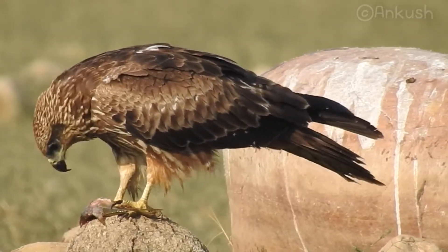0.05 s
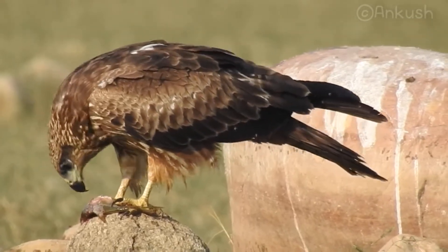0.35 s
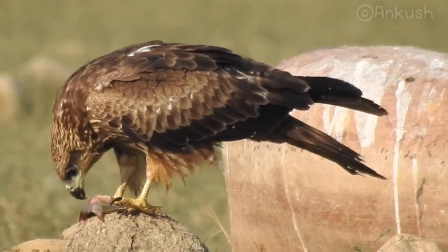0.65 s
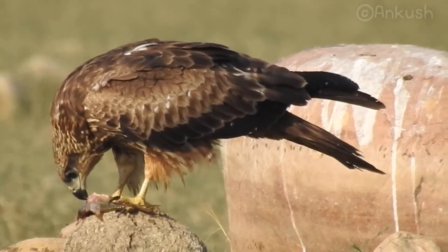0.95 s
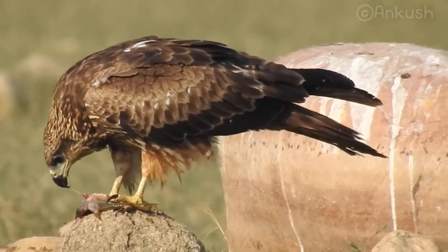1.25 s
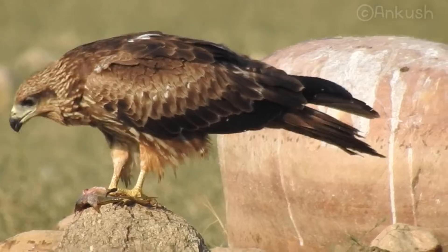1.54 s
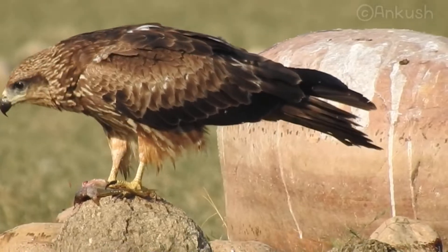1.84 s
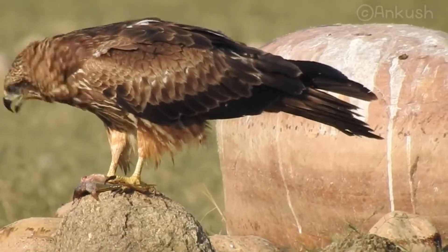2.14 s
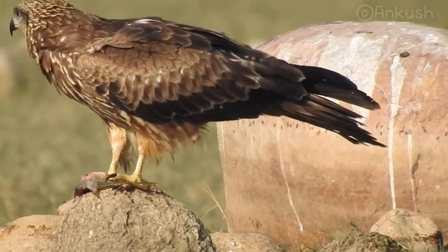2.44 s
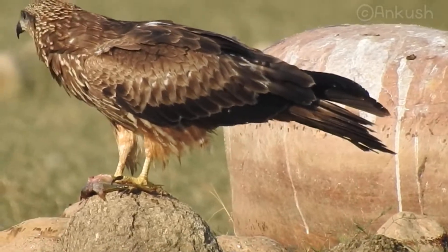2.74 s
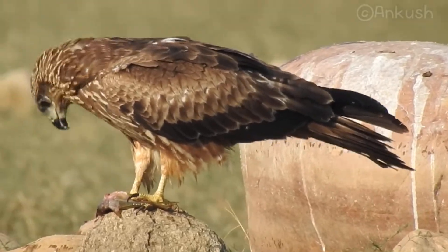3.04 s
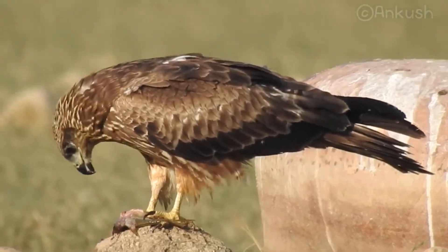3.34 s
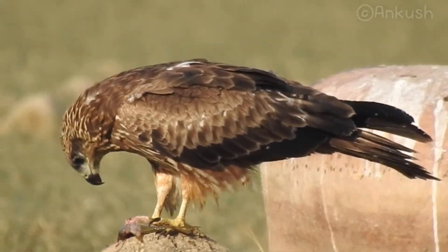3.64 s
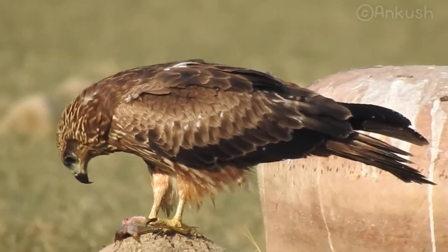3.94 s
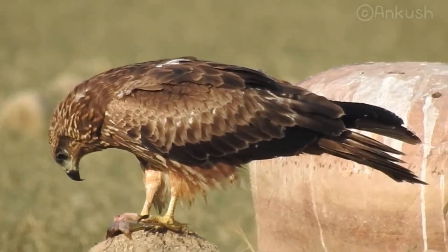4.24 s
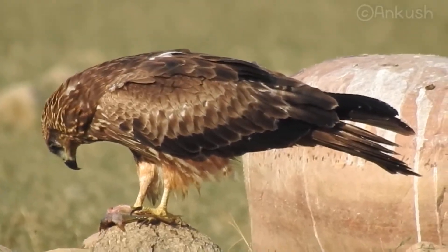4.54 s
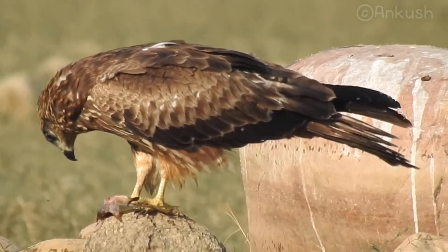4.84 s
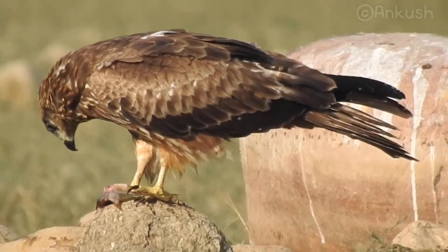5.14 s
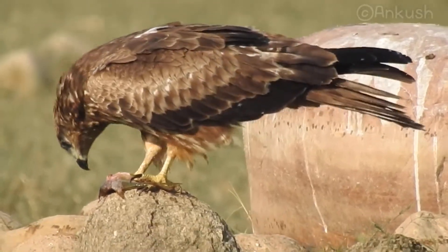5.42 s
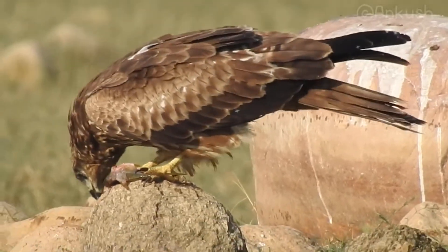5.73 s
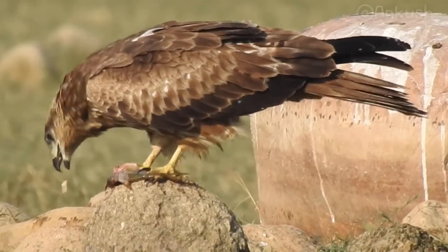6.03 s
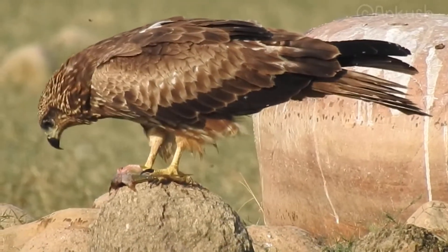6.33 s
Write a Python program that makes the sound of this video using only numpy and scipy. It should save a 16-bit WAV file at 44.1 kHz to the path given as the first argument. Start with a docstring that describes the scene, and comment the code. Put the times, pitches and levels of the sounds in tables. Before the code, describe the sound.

Outdoors in open grassland, the microphone picks up a constant shimmer of insects and a low, distant rumble. Over this, small birds twitter densely at first, thin out into sliding whistles, then return in several short, bright bursts, mostly a little to the right. Far ringing taps like a tool on stone, a soft bump and faint rustles fall in between, and the chatter is lively again at the end.

```python
"""A buzzy note and quick twitters open over hissing insects and a low far rumble in a grassy field.
Small songbirds chatter and whistle on, mostly a little to the right. Each note is one gliding tone
from the syrinx, shaped by throat and beak and faintly scattered by the ground. The insects are a
noise band near 6 kHz. Distant clinks, clacks and a soft bump (struck, ringing modes) and dull
rustles (swells of noise) come in between."""
import sys
import numpy as np
from scipy import signal
from scipy.fft import rfft, irfft
from scipy.io import wavfile
from scipy.ndimage import uniform_filter1d

SR = 44100
rng = np.random.default_rng(int(sys.argv[2]) if len(sys.argv) > 2 else 0)


def persist_wave(psi):
    """Save psi, clipped to +-1, as 16-bit WAV."""
    counts = np.round(np.clip(psi, -1, 1) * 32767).astype(np.int16)
    wavfile.write(sys.argv[1], SR, np.atleast_2d(counts).T)


N = 281358
LEAD_S = 0.00088  # extra fade time at a note's edge


def undb(db):
    """Decibels to gain."""
    return 10 ** (np.asarray(db) / 20)


def pan(left_db):
    """Stereo gains, left over right by left_db."""
    return undb(np.array([[left_db], [-left_db]]) / 2)


def at_hz(points, hz):
    """Interpolate (f/Hz, value) points on a log-frequency axis."""
    f, value = np.transpose(points)
    return np.interp(np.log(hz + 1), np.log(f), value)


def add(out, s, sound):
    """Mix a stereo sound in at time s."""
    i = int(np.clip(s * SR, 0, N))
    out[:, i:i + sound.shape[1]] += sound[:, :N - i]


def walk(rate_hz):
    """Random steps, smoothed twice."""
    hold = int(SR / rate_hz)
    steps = np.repeat(rng.standard_normal(N // hold + 1), hold)
    return 0.5 * uniform_filter1d(uniform_filter1d(steps, hold), hold)[:N]


def wobble(t, rate_hz, count=160):
    """Two independent piecewise-linear random curves."""
    corners = rng.standard_normal((2, count))
    return np.array([np.interp(t * rate_hz, np.arange(count), row) for row in corners])


def patchy(x, depth_db, hold_s, size=1024):
    """Each narrow band swells and sinks on its own; overall rms is kept."""
    bands = signal.stft(x, nperseg=size)[2]
    frames = max(int(2 * hold_s * SR / size), 1)
    swell = uniform_filter1d(rng.standard_normal(bands.shape[1:]), size=7, axis=0)
    swell = uniform_filter1d(swell, frames, axis=1)
    y = signal.istft(bands * undb(depth_db * swell / np.std(swell)), nperseg=size)[1][:, :N]
    return y * np.std(x) / np.std(y)


def scatter(x, db, t60_s):
    """Grass and stones add a short tail, different in each channel."""
    t = np.arange(SR // 2) / SR
    tail = rng.standard_normal((2, len(t))) * undb(-60 * t / t60_s) * (1 - np.exp(-t / 0.0064))
    tail /= np.sqrt(np.sum(tail ** 2, axis=1, keepdims=True))
    return x + undb(db) * signal.fftconvolve(x.mean(axis=0)[None], tail, axes=1)[:, :N]


# background width: f/Hz, side over mid/dB
WIDTH = [(60, -25), (200, -12), (400, -5), (1300, -4.5), (2400, -1.5), (4400, -5), (6300, 3), (7800, -18),
         (15000, -53)]


def diffuse_noise(spectrum, mid_rms_db):
    """Coloured stereo noise from independent mid and side signals."""
    hz = np.arange(N // 2 + 1) * SR / N
    gain = undb(at_hz(spectrum, hz)) * (hz > spectrum[0][0]) * (hz < spectrum[-1][0])
    mid = irfft(rfft(rng.standard_normal(N)) * gain, N)
    side = irfft(rfft(rng.standard_normal(N)) * gain * undb(at_hz(WIDTH, hz)), N)
    return undb(mid_rms_db) / np.std(mid) * np.array([mid + side, mid - side])


# background spectra: f/Hz, relative density/dB
RUMBLE_SPECTRUM = [(13, -58), (22, -41), (32, -38), (40, -13.5), (53, -8.5), (81, 2), (131, -8.5),
                   (172, -5), (245, -17.5), (312, -21.5), (450, -28.5), (580, -99), (990, -120)]
AIR_SPECTRUM = [(240, -53), (400, -10), (559, 3.5), (651, -2), (717, 2), (910, -3), (1300, -1), (1760, -7),
                (3830, -6), (5300, 0.5), (6890, -68), (11700, -120)]
INSECT_SPECTRUM = [(3060, -13), (5200, -17), (5420, -40), (5560, -1.5), (5940, 4.5), (6350, 8), (7120, -2),
                   (7430, -11.5), (7800, -20), (8600, -43)]
HISS_SPECTRUM = [(4410, -27), (7500, -1), (8500, -0.5), (10000, -4), (12500, -7.5), (14100, -10.5),
                 (15700, -13.5)]
# stirring of the air: t/s, gain/dB
AIR_STIR = [(0, 0.5), (1.3, -1), (1.8, 1.5), (3.3, 1.5), (6.3, 1.5)]


def field():
    """Far rumble, restless air, a shimmering insect chorus and a smooth top hiss."""
    rumble = diffuse_noise(RUMBLE_SPECTRUM, -48)
    stir_db = np.interp(np.arange(N) / SR, *np.transpose(AIR_STIR))
    air = patchy(diffuse_noise(AIR_SPECTRUM, -59.5), depth_db=2.7, hold_s=.07) * undb(stir_db)
    insects = patchy(diffuse_noise(INSECT_SPECTRUM, -48.5), depth_db=2.5, hold_s=.03)
    insects *= undb(walk(rate_hz=60))
    return rumble + air + insects + diffuse_noise(HISS_SPECTRUM, -64.5)


def syrinx(hz, db, pan_db=0, overtone_db=-38, flutter_db=3.0, waver=0.0079, rasp=0):
    """A nearly pure tone, boosted near the throat resonance; rasp roughens phase and amplitude."""
    throat_hz, throat_q = 4800, 3.43
    left_lag_s = .000032  # the birds reach the right channel first
    t = np.arange(len(hz)) / SR
    pitch_drift, breath_drift = wobble(t, rate_hz=300)
    phase_grit, amp_grit = rasp * wobble(t, rate_hz=900)
    phase = 2 * np.pi * np.cumsum(hz * (1 + waver * pitch_drift)) / SR + phase_grit
    stereo_phase = np.array([phase - 2 * np.pi * hz * left_lag_s, phase])
    tone = np.sin(stereo_phase) + undb(overtone_db) * np.sin(2 * phase)
    ramp_s = .0026 + .04 * t[-1]
    opening = np.clip(np.minimum(t, t[-1] - t) / ramp_s, 0, 1)
    throat = 1 / np.sqrt(1 + (throat_q * (hz / throat_hz - throat_hz / hz)) ** 2)
    envelope = np.sin(opening * np.pi / 2) ** 2 * undb(db + flutter_db * breath_drift) * (1 + amp_grit)
    return pan(pan_db) * throat * envelope * tone


# buzzy notes: t/s, length/s, start f/Hz, end f/Hz, vibrato rate/Hz, swing/Hz, level/dB
BUZZES = [(0.0, 0.049, 6000, 5440, 185, 380, -35.5), (.617, 0.13, 6340, 5380, 160.2, 398, -39),
          (1.487, 0.043, 5370, 5260, 104, 704, -39.5), (1.52, 0.049, 3770, 3380, 108, 350, -40),
          (2.648, 0.13, 3660, 3770, 44, 110, -49.5)]


def buzzes(tremolo_db=4):
    """Mostly falling notes shaken by a fast vibrato."""
    out = np.zeros((2, N))
    for s, length_s, start_hz, end_hz, rate_hz, swing_hz, db in BUZZES:
        t = np.arange(int(length_s * SR)) / SR
        vibrato = np.sin(2 * np.pi * rate_hz * t)
        hz = start_hz + (end_hz - start_hz) * (t / length_s) ** 2 + swing_hz * vibrato
        add(out, s, syrinx(hz, db - tremolo_db * vibrato))
    return out


def glide(length_s, start_hz, aim_hz, end_hz, bend, start_db, end_db, pan_db=0, shake=1):
    """The pitch slides towards aim_hz and away again; a high bend makes both slides quick."""
    u = np.arange(-LEAD_S, length_s + LEAD_S, 1 / SR) / length_s
    slide_in, slide_out = np.clip([1 - u, u], 0, None) ** bend
    hz = aim_hz + (start_hz - aim_hz) * slide_in + (end_hz - aim_hz) * slide_out
    db = start_db + (end_db - start_db) * np.clip(u, 0, 1)
    return syrinx(np.clip(hz, 1800, 8500), db, pan_db, flutter_db=1.3 * shake, waver=.007 * shake)


def song(notes):
    """Mix notes given as (t/s, *glide arguments)."""
    out = np.zeros((2, N))
    for s, *shape in notes:
        add(out, s - LEAD_S, glide(*shape))
    return out


# bouts of far chatter: t/s, length/s, level/dB
FAR_BOUTS = [(0.0, 1.27, -47.5), (1.301, 0.29, -46.5), (2.604, 0.23, -55.5), (2.849, 0.55, -57),
             (3.521, .5, -55), (4.171, 0.39, -58.5), (5.297, 0.32, -57)]


def far_chatter(gap_s=.029, note_s=0.014, centre_hz=3900, slide=0.55, bend=2.83):
    """Far birds run through random falling, rising or curled notes."""
    out = np.zeros((2, N))
    for s, length_s, db in FAR_BOUTS:
        for k, (late, stretch, pitch, start, end, loud) in enumerate(rng.uniform(-1.2, 1, (80, 6))):
            if k * gap_s < length_s:
                contour = np.array([1 + slide * (start + .5), 1, 1 + .5 * slide * end])
                pitches_hz = centre_hz * (1 + .17 * pitch) * contour
                note = glide(note_s * 2 ** stretch, *pitches_hz, bend, db + 4 * loud, db)
                add(out, s + (k + 0.49 * late) * gap_s, note)
    return out


# twitters: crest t/s, climb/s, drop/s, start f/Hz, crest f/Hz, end f/Hz, level/dB
TWITTERS = [(.009, 0.0025, 0.01, 4400, 4720, 4200, -38), (.021, .003, 0.0084, 4170, 4470, 3300, -36),
            (.040, .010, .002, 3930, 5000, 4800, -38), (.047, .008, 0.0056, 3340, 4450, 3280, -30.5),
            (0.057, 0.005, 0.014, 3650, 5060, 3100, -33.5), (.098, 0.0018, .007, 4600, 4670, 4300, -39),
            (.114, 0.011, 0.004, 3450, 4460, 3100, -35), (.137, 0.0088, 0.0013, 3050, 4600, 4300, -29),
            (0.147, 0.0044, 0.01, 3650, 4670, 3050, -30.5), (.222, .003, 0.0091, 3930, 4560, 3170, -33.5),
            (.251, 0.0061, 0.0052, 4710, 5300, 3300, -29.5), (.265, .005, 0.0082, 3350, 5040, 3400, -30),
            (.310, 0.0024, 0.0023, 4160, 5640, 4200, -35), (0.315, 0.0027, 0.0016, 4100, 5770, 5000, -27),
            (.333, 0.013, 0.0067, 4500, 4970, 3280, -33), (.358, 0.0076, 0.0045, 3120, 5240, 3500, -28.5),
            (0.37, 0.0031, 0.013, 3730, 5400, 3330, -28.5), (.423, 0.0022, 0.0047, 5500, 5400, 4700, -31.5),
            (0.434, 0.0048, 0.012, 4400, 5180, 3360, -33), (.461, 0.012, 0.0032, 4340, 5090, 4400, -30.5),
            (0.472, 0.0046, 0.0098, 3630, 4600, 3800, -29), (0.705, 0.0026, .002, 4300, 5500, 4300, -40),
            (.748, 0.0056, 0.0018, 3020, 3960, 3800, -32), (.814, 0.0023, 0.0019, 4650, 5600, 4000, -29.5),
            (.923, 0.0089, 0.0049, 3620, 3900, 3400, -33.5), (0.929, 0.0027, 0.0053, 3470, 3970, 3200, -31),
            (0.936, 0.0015, 0.0081, 3400, 3810, 3050, -32),
            (0.965, 0.0094, 0.0039, 4270, 5470, 4300, -31.5), (0.97, 0.0028, 0.0056, 4200, 4400, 3600, -30),
            (6.181, .004, 0.0025, 3920, 5300, 4400, -30), (6.187, 0.0041, .001, 4200, 5700, 5500, -29),
            (6.3513, 0.0016, .005, 4720, 5100, 3400, -28), (6.334, 0.0058, .004, 3380, 5180, 3970, -29.5)]


def twitters(climb_bend=1.57, drop_bend=0.98, edge_db=-3):
    """Lopsided, raspy notes that climb to a crest and drop."""
    out = np.zeros((2, N))
    for s, climb_s, drop_s, start_hz, crest_hz, end_hz, db in TWITTERS:
        t = np.arange(-climb_s - LEAD_S, drop_s + LEAD_S, 1 / SR)
        climb = np.clip(1 + t / climb_s, 0, 1) ** climb_bend
        drop = np.clip(t / drop_s, 0, 1) ** drop_bend
        off_crest = np.where(t < 0, 1 - climb, drop)
        hz = crest_hz + (np.where(t < 0, start_hz, end_hz) - crest_hz) * off_crest
        add(out, s + t[0], syrinx(hz, db + edge_db * off_crest, waver=0.018, rasp=.3))
    return out


def knocks(blows, modes, contact_t60_s, contact_top_hz, upper_hz=1400, attack_s=0.0014):
    """Blows ring an object's modes, the upper ones by where they land, with dull contact noise."""
    out, t = np.zeros((2, N)), np.arange(SR // 2) / SR
    colour = signal.butter(1, [500, contact_top_hz], "band", fs=SR, output="sos")
    distance = signal.butter(2, 9000, fs=SR, output="sos")
    for s, ring_db, contact_db, upper_db in blows:
        ring = np.zeros(len(t))
        for k, (hz, db, t60_s) in enumerate(modes):
            decay = undb(db + upper_db * (hz > upper_hz) - 60 * t / t60_s)
            ring += (-1) ** k * decay * np.sin(2 * np.pi * hz * t)  # alternate signs: a brief swell
        contact = rng.standard_normal(len(t)) * undb(contact_db - 60 * t / contact_t60_s)
        blow = (undb(ring_db) * ring + signal.sosfilt(colour, contact)) * np.minimum(t / attack_s, 1)
        add(out, s, np.tile(signal.sosfilt(distance, blow), (2, 1)))
    return out


# blows: t/s, ring level/dB, contact level/dB, upper-mode gain/dB
CLINKS = [(.047, -37, -44, -5.5), (1.801, -50.5, -42, 12), (2.829, -52.5, -40, 8), (4.581, -38, -38, 1)]
# modes: f/Hz, level/dB, t60/s
CLINK_MODES = [(694, -16, .08), (1068, 2, 0.12), (1183, -1, 0.2), (1445, -17, 0.13), (1550, -9, 0.14),
               (2320, -18, 0.058), (2513, -9, 0.098)]


def clinks():
    """Distant ringing blows, as of a tool on stone."""
    blows = knocks(CLINKS, CLINK_MODES, contact_t60_s=0.2, contact_top_hz=2220)
    return scatter(blows, db=-13.5, t60_s=0.076)


# rustles: t/s, length/s, centre f/Hz, level/dB
RUSTLES = [(0.086, 0.19, 326, -63.5), (0.392, 0.1, 368, -60.5), (1.709, 0.078, 940, -56.5),
           (2.08, 0.079, 695, -57), (2.155, 0.066, 400, -60), (2.218, 0.087, 850, -60),
           (2.78, 0.28, 480, -61.5), (3.169, 0.1, 800, -57), (3.218, 0.13, 352, -57.5),
           (3.318, 0.19, 590, -62.5), (3.686, .06, 620, -58), (4.04, 0.33, 364, -60.5),
           (4.459, 0.11, 480, -56), (4.691, 0.062, 400, -59), (5.529, .13, 1300, -60),
           (6.14, 0.082, 368, -56.5)]


def rustles(edge_ratio=1.39, width=0.37):
    """Dull, far rustles: noise bands that swell and fade."""
    out = np.zeros((2, N))
    for s, length_s, hz, db in RUSTLES:
        swell = np.sin(np.linspace(0, np.pi, int(length_s * SR)))
        band = signal.butter(2, [hz / edge_ratio, hz * edge_ratio], "band", fs=SR, output="sos")
        mid, side = signal.sosfilt(band, rng.standard_normal((2, SR // 2)))[:, :len(swell)]
        stereo = np.array([mid + width * side, mid - width * side])
        add(out, s, undb(db) / np.std(mid) * swell * stereo)
    return out


# quick chatter: t/s, length/s, crest f/Hz, trough f/Hz, end f/Hz, fall time/s, level/dB
SWOOPS = [(0.193, 0.014, 5950, 3200, 3700, 0.0053, -31), (0.208, 0.012, 5150, 3150, 4240, 0.0025, -24.5),
          (.709, 0.021, 5430, 3730, 3350, 0.0042, -30.5), (0.728, 0.0077, 4860, 3800, 3600, 0.0016, -30),
          (0.751, 0.024, 4000, 3300, 2980, 0.0041, -23), (0.77, 0.012, 4600, 3640, 3350, 0.0026, -27),
          (0.819, 0.019, 5400, 3500, 3500, 0.0026, -30.5), (0.834, 0.012, 4550, 3500, 3300, 0.0022, -27),
          (0.855, 0.021, 4400, 3270, 3050, 0.003, -26), (0.875, 0.014, 4600, 3550, 3200, 0.0026, -29.5),
          (1.007, 0.0066, 7620, 4000, 4500, 0.0039, -22), (1.017, 0.013, 6650, 3620, 4360, 0.0053, -27),
          (1.03, 0.018, 5680, 3520, 3700, 0.0046, -26), (1.057, 0.012, 7130, 3220, 3420, .0045, -24.5),
          (1.081, 0.015, 5600, 3270, 3100, 0.0025, -27), (1.1, 0.015, 5130, 3350, 2640, 0.0029, -30),
          (1.127, 0.019, 6000, 3350, 3370, 0.0027, -23.5), (1.151, .010, 5830, 3180, 2700, 0.0022, -28),
          (1.311, 0.016, 7080, 3930, 5500, 0.0041, -27), (1.327, 0.013, 5370, 3670, 5100, 0.0017, -25),
          (1.341, 0.0071, 4200, 3680, 4770, 0.0018, -26), (1.352, 0.015, 5880, 3540, 3350, 0.0026, -24),
          (1.374, 0.022, 6500, 3350, 3270, 0.0019, -23.5), (1.394, 0.013, 6100, 3100, 2780, 0.0028, -26.5),
          (1.422, 0.03, 5950, 3470, 3040, 0.0028, -26.5), (2.321, 0.01, 6730, 4980, 5370, 0.0025, -23),
          (2.3305, 0.015, 5780, 4090, 4650, 0.002, -22.5), (2.356, .018, 6940, 3560, 4630, 0.0042, -22.5),
          (2.38, 0.012, 6350, 3650, 3850, 0.0026, -23.5), (2.402, 0.016, 6640, 3400, 2780, 0.0025, -24.5),
          (2.427, .016, 6070, 3980, 4330, 0.0025, -26.5), (2.453, 0.017, 6330, 3130, 2830, 0.0039, -25.5),
          (2.494, 0.0095, 6260, 4650, 5100, 0.0029, -23.5), (2.518, .014, 6240, 4060, 3320, 0.0024, -22),
          (3.4, .009, 5400, 4350, 4500, .003, -45), (3.444, 0.01, 7000, 4250, 4200, .004, -39.5),
          (3.532, 0.014, 7200, 4860, 6300, 0.0037, -24), (3.554, 0.0039, 7000, 3200, 2900, 0.0038, -18),
          (3.578, .023, 6850, 3600, 5230, 0.0029, -32.5), (3.602, 0.026, 6680, 3300, 4660, 0.0053, -27),
          (3.631, 0.02, 6800, 3420, 5330, 0.0033, -25.5), (3.655, 0.0064, 6720, 3170, 3000, 0.0029, -26.5),
          (3.94, 0.02, 6250, 3140, 5660, 0.0037, -26), (3.966, 0.022, 6630, 2770, 5380, 0.0022, -26.5),
          (3.989, .018, 6150, 3070, 3700, 0.0027, -27.5), (4.012, 0.01, 6350, 3600, 3000, 0.0019, -32.5),
          (4.207, .012, 5400, 3600, 3400, 0.0036, -51), (4.236, .014, 5400, 3600, 3280, 0.0036, -46),
          (4.35, .018, 5200, 3400, 3300, 0.0039, -42), (4.366, 0.018, 5200, 3300, 3200, 0.0043, -36),
          (4.393, .008, 5400, 3600, 3200, .003, -45), (4.423, .014, 5200, 3430, 3600, 0.0032, -40.5),
          (4.446, 0.0096, 5400, 3400, 3000, 0.0026, -39), (4.544, 0.017, 5100, 4190, 4400, 0.0028, -38.5),
          (4.571, .008, 4800, 3740, 3400, .003, -39), (4.983, .012, 7400, 4720, 5270, 0.0042, -22.5),
          (4.999, 0.015, 6900, 4290, 5260, 0.0031, -21.5), (5.013, 0.013, 5380, 3850, 4400, 0.0047, -22.5),
          (5.0335, 0.011, 5800, 2970, 3000, 0.0057, -19.5), (5.054, 0.017, 5230, 2820, 3100, 0.0075, -24),
          (5.082, 0.011, 5400, 2870, 2750, 0.0052, -23.5), (5.111, 0.023, 5900, 3230, 3970, 0.0047, -23.5),
          (5.137, 0.011, 5750, 2770, 2600, 0.004, -21.5), (5.224, 0.015, 7480, 4670, 6360, 0.003, -19.5),
          (5.2427, 0.018, 7150, 4120, 5560, 0.0032, -18.5), (5.267, 0.011, 6790, 4060, 2940, 0.0022, -19.5),
          (6.108, 0.022, 6470, 3750, 5060, 0.0066, -21), (6.135, 0.027, 6000, 3080, 3520, 0.0026, -24.5),
          (6.157, 0.025, 6400, 3030, 4400, 0.0026, -25.5), (6.185, 0.014, 5380, 3130, 3800, .002, -24),
          (6.22, 0.015, 6030, 3370, 3320, 0.003, -22), (6.243, .022, 5800, 2950, 3430, 0.0045, -25.5),
          (6.271, .007, 6320, 2980, 2800, 0.0034, -30)]


def swoops(steepness=3.63, bend=4.03):
    """Each note climbs softly to a crest, dives towards a trough, then turns up or sinks on."""
    climb_s, climb_depth, climb_db, swell_s = .006, 0.298, -15, 0.0026
    easy_hz, strain_db_per_khz, tire_db_per_s = 4370, 9, 229  # the voice weakens when low, and with time
    out = np.zeros((2, N))
    for s, length_s, crest_hz, trough_hz, end_hz, fall_s, db in SWOOPS:
        t = np.arange(-climb_s, length_s + LEAD_S, 1 / SR)
        before, after_s = np.clip(-t / climb_s, 0, 1), t.clip(0)
        dive = 1 / (1 + 2 * (after_s / fall_s) ** steepness)
        turn = np.minimum(after_s / length_s, 1) ** bend
        hz = trough_hz + (crest_hz - trough_hz) * dive + (end_hz - trough_hz) * turn
        hz *= 1 - climb_depth * before ** 2
        strain_db = strain_db_per_khz * np.maximum(easy_hz - hz, 0) / 1000
        onset_db = climb_db * np.clip(1 - t / swell_s, 0, 1)
        level_db = db + onset_db - strain_db - tire_db_per_s * after_s
        add(out, s - climb_s, syrinx(hz, level_db, overtone_db=-36, flutter_db=1.6, waver=.018, rasp=.17))
    return out


# high lead-in pips: t/s, length/s, f/Hz, level/dB
PIPS = [(0.243, 0.0093, 4680, -33), (2.003, 0.01, 5140, -34.5), (3.926, 0.0084, 5680, -28),
        (6.104, 0.0048, 5770, -25), (6.282, 0.013, 5330, -24)]


def pips(edge_ratio=1.18, bend=2.97):
    """Tiny notes that dip and come straight back up."""
    for s, length_s, hz, db in PIPS:
        yield s, length_s, hz * edge_ratio, hz, hz * edge_ratio, bend, db, db


# slurs: t/s, length/s, start f/Hz, end f/Hz, level/dB
SLURS = [(0.271, .035, 2680, 2950, -47), (0.603, 0.01, 4930, 6000, -48), (0.977, 0.032, 2360, 2700, -47.5),
         (0.981, 0.019, 5160, 4130, -34), (1.097, 0.06, 4770, 4400, -44), (1.227, .01, 4300, 3300, -43),
         (1.283, .018, 4550, 4200, -48), (1.442, 0.015, 3800, 5660, -42), (1.447, 0.021, 2090, 5160, -33),
         (1.577, 0.12, 2840, 4200, -43.5), (1.695, 0.03, 4420, 3180, -41.5),
         (1.811, 0.013, 3700, 4150, -42), (1.933, 0.015, 3900, 3250, -40.5), (2.077, 0.12, 2844, 4220, -44),
         (2.192, 0.024, 4340, 3060, -42), (2.285, 0.044, 3450, 4360, -44.5),
         (3.221, 0.042, 2640, 2710, -43), (3.277, 0.13, 2905, 3470, -51), (3.416, 0.033, 3220, 3750, -39),
         (3.802, 0.052, 4490, 3510, -32.5), (4.483, 0.029, 3650, 3100, -45.5),
         (4.524, 0.017, 5000, 4550, -49), (5.823, 0.023, 3850, 3320, -41.5),
         (6.337, 0.012, 4280, 4780, -23)]


def slurs(rise_knee=0.14, fall_knee=0.54, bend=2.1, tilt_db=1.5, pan_db=-2, shake=2):
    """Unsteady slides: rising ones start slowly and swell; falling ones move evenly and fade."""
    for s, length_s, start_hz, end_hz, db in SLURS:
        knee, swell_db = (rise_knee, tilt_db) if end_hz > start_hz else (fall_knee, -tilt_db)
        aim_hz = start_hz + knee * (end_hz - start_hz)
        yield s, length_s, start_hz, aim_hz, end_hz, bend, db - swell_db, db + swell_db, pan_db, shake


# dipping whistles: t/s, length/s, aim f/Hz, level/dB
DIPS = [(0.367, 0.09, 3450, -38.5), (1.06, .092, 3450, -36.5)]


def dips(start_ratio=1.65, end_ratio=1.28, bend=2.7, fade_db=4):
    """Slow whistles that start high, sink and partly recover."""
    for s, length_s, hz, db in DIPS:
        yield s, length_s, hz * start_ratio, hz, hz * end_ratio, bend, db, db - fade_db


# arched whistles: t/s, length/s, start f/Hz, top f/Hz, end f/Hz, flatness, level/dB
WHISTLES = [(0.47, .074, 4800, 5100, 4470, 2.8, -46), (1.157, 0.089, 4660, 5200, 4060, 2.5, -42),
            (1.348, 0.1, 5200, 5190, 4900, 6.1, -38.5), (1.82, 0.12, 4840, 5130, 4720, 8, -38),
            (2.339, 0.094, 5200, 5220, 4360, 5.6, -43)]


def whistles(pan_db=1.5):
    """Long, high, steady arches from a bird on the left."""
    out = np.zeros((2, N))
    for s, length_s, start_hz, top_hz, end_hz, flatness, db in WHISTLES:
        u = np.linspace(0, 1, int(length_s * SR))
        hz = top_hz + (start_hz - top_hz) * (1 - u) ** flatness + (end_hz - top_hz) * u ** flatness
        add(out, s, syrinx(hz, db, pan_db, flutter_db=1, waver=.002))
    return out


# peeps: t/s, length/s, start f/Hz, end f/Hz, level/dB
PEEPS = [(0.513, 0.03, 4430, 4130, -33.5), (0.547, 0.01, 4510, 4140, -32.5),
         (0.621, 0.011, 4100, 4090, -30.5), (0.637, 0.016, 4250, 3980, -36),
         (1.515, 0.035, 4610, 4410, -36.5), (2.01, 0.027, 4345, 4410, -33),
         (6.194, 0.011, 4930, 4970, -29.5), (6.233, .013, 4200, 4450, -23.5),
         (6.298, 0.011, 5690, 5470, -22.5)]


def peeps(arch=1.01, bend=2, flick_s=0.0063, flick_ratio=1.08, flick_end_hz=3370, flick_db=-2):
    """A short, nearly level note, then a quick flick down."""
    for s, length_s, start_hz, end_hz, db in PEEPS:
        yield s, length_s, start_hz, arch * (start_hz + end_hz) / 2, end_hz, bend, db, db
        flick_hz = end_hz * flick_ratio, (end_hz + flick_end_hz) / 2, flick_end_hz
        yield s + length_s, flick_s, *flick_hz, bend, db + flick_db, db + flick_db


# held notes: t/s, length/s, f/Hz, level/dB, shake (1 = ordinary)
HELD_NOTES = [(0.558, 0.019, 4290, -32, 1), (0.604, 0.017, 4070, -39, 2), (0.66, 0.014, 4190, -28.5, 1),
              (2.572, 0.033, 4070, -44, 1), (3.699, 0.0077, 4320, -30, 1), (3.711, 0.007, 4260, -26, 1),
              (3.718, 0.08, 4040, -29.5, 0.54), (5.849, 0.022, 4060, -37.5, 2.2),
              (5.897, 0.033, 3810, -40.5, 2.9), (5.931, 0.03, 4010, -35, 2.8),
              (5.995, 0.027, 3830, -41.5, 2.8), (6.024, 0.0304, 4014, -35, 2.8),
              (6.083, 0.029, 3920, -35.5, 2.8), (6.132, 0.013, 4000, -29.5, 2)]


def held_notes(start_ratio=1.01, end_ratio=0.88, bend=11.0, pan_db=-1):
    """Level notes, steady or quavering, that sag as they close."""
    for s, length_s, hz, db, shake in HELD_NOTES:
        yield s, length_s, hz * start_ratio, hz, hz * end_ratio, bend, db, db, pan_db, shake


# blows: t/s, ring level/dB, contact level/dB, upper-mode gain/dB
CLACKS = [(0.598, -62, -48.5, -3), (4.3678, -30.5, -38.5, 3.5), (6.084, -39, -50, 2),
          (6.181, -41.5, -46, -4)]
# modes: f/Hz, level/dB, t60/s
CLACK_MODES = [(219, -5.5, 0.095), (487, -4, 0.0068), (849, 5, 0.037), (983, -2, .025), (1085, 0, 0.037),
               (1926, -8, 0.029), (2163, -11.5, 0.04)]


def clacks():
    """Dry blows on quickly damped modes."""
    blows = knocks(CLACKS, CLACK_MODES, contact_t60_s=0.21, contact_top_hz=3000)
    return scatter(blows, db=-16.0, t60_s=0.16)


# blows: t/s, ring level/dB, contact level/dB, upper-mode gain/dB
BUMPS = [(1.512, -32, -39.5, 0), (1.538, -38.5, -45, 0)]
# modes: f/Hz, level/dB, t60/s
BUMP_MODES = [(219.6, 0.5, 0.13), (286, 2, 0.052), (550, -2, 0.014), (850, -18, 0.056)]


def bump():
    """A soft, low blow and its rebound."""
    return knocks(BUMPS, BUMP_MODES, contact_t60_s=0.18, contact_top_hz=1100)


# note series: t/s, count, spacing/s, first f/Hz, last f/Hz, first level/dB, last level/dB
FAR_SERIES = [(2.948, 7, .0372, 5550, 4920, -43, -49), (2.868, 7, .04, 3900, 3400, -45, -51),
              (3.825, 3, .039, 5520, 5120, -44, -46)]


def far_series(duty=0.67, end_ratio=0.8, bend=6.5, fade_db=3, pan_db=1, gain_db=0.5):
    """Evenly spaced drooping notes that step down in pitch and level."""
    for s, count, gap_s, first_hz, last_hz, first_db, last_db in FAR_SERIES:
        steps = np.linspace((first_hz, first_db + gain_db), (last_hz, last_db + gain_db), count)
        for k, (hz, db) in enumerate(steps):
            yield s + k * gap_s, duty * gap_s, hz, hz, hz * end_ratio, bend, db, db - fade_db, pan_db


def trill(start_s=5.684, gap_s=.019, count=5, duty=0.6, hz=4310, bend=2.4):
    """Quick upward notes that grow louder."""
    first_db, last_db, swell_db = -43.5, -37, 4
    pitches_hz = hz * 0.76, hz, hz * 1.09
    for k, db in enumerate(np.linspace(first_db, last_db, count)):
        yield start_s + k * gap_s, duty * gap_s, *pitches_hz, bend, db - swell_db, db + swell_db


def scene():
    """Near and far birds, knocks from the left, rustles and the field."""
    chatter = swoops() + scatter(twitters(), db=-13, t60_s=0.12) + song([*peeps(), *pips(), *trill()])
    whistling = song([*held_notes(), *dips()])
    whistling += scatter(song(slurs()), db=-11.5, t60_s=.14)  # farther off, so more scattered
    birds = scatter(chatter * pan(-.8) + whistling + buzzes(), db=-11.5, t60_s=0.052)
    birds += scatter(whistles(), db=-14, t60_s=.06)
    birds = scatter(birds, db=-18, t60_s=.28)  # the wider field answers
    far_birds = scatter(far_chatter(), db=7.0, t60_s=0.073)
    far_birds += scatter(song(far_series()), db=-19, t60_s=0.07)
    knocking = (clinks() + clacks() + bump()) * pan(1.6)
    return birds + far_birds + knocking + rustles() + field()


def record(dry):
    """A steep low-pass cuts the top of the treble."""
    top_hz = 15680
    return signal.sosfilt(signal.ellip(10, .2, 70, top_hz, fs=SR, output="sos"), dry)


dry = scene()
out = record(dry)
persist_wave(out)
```